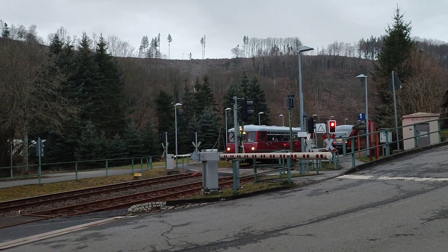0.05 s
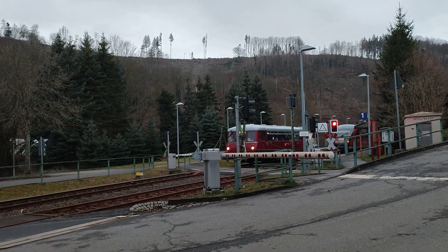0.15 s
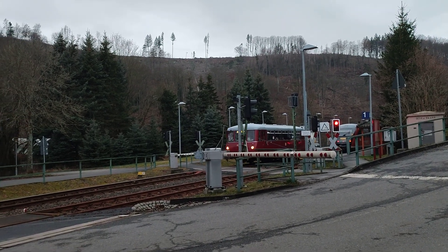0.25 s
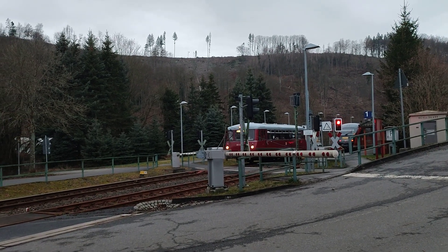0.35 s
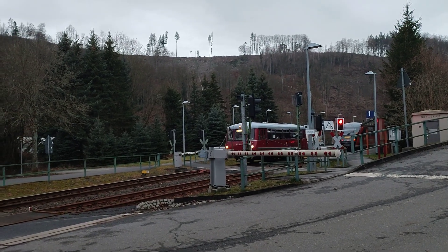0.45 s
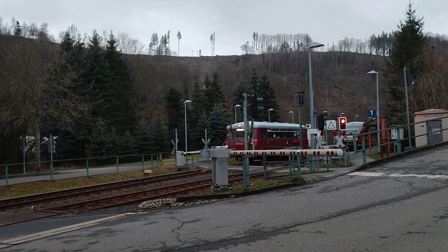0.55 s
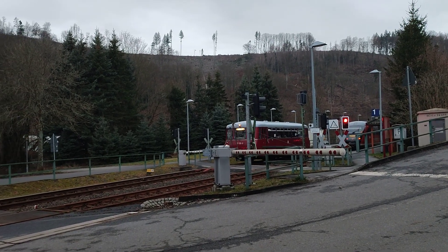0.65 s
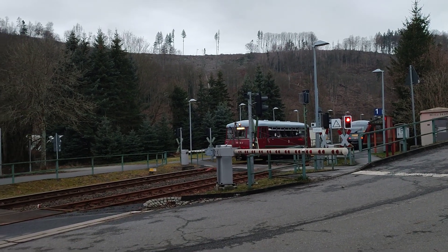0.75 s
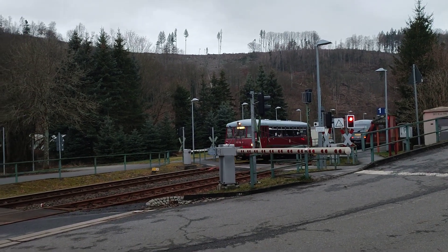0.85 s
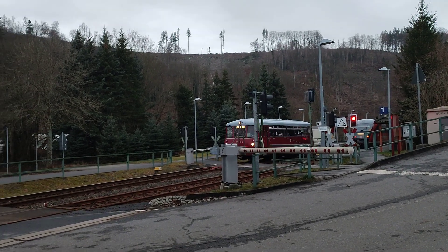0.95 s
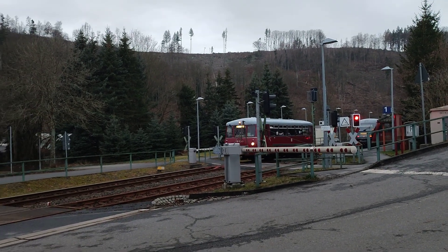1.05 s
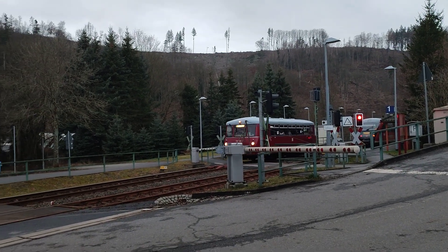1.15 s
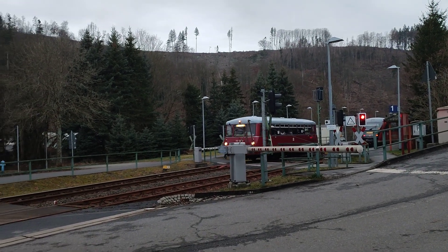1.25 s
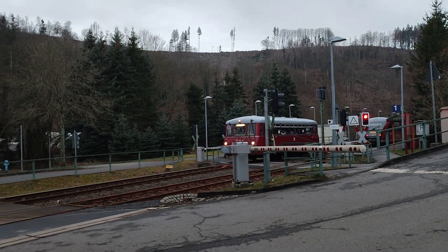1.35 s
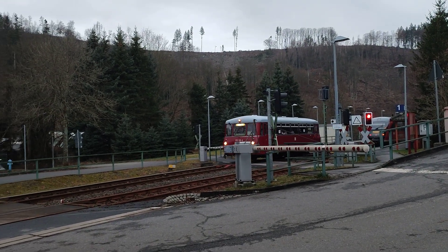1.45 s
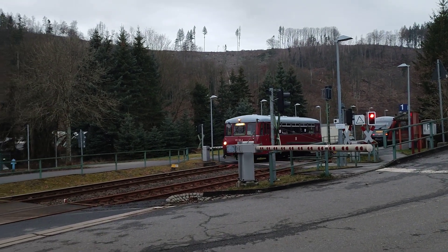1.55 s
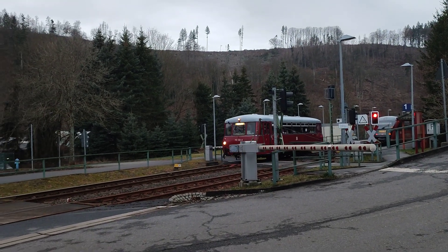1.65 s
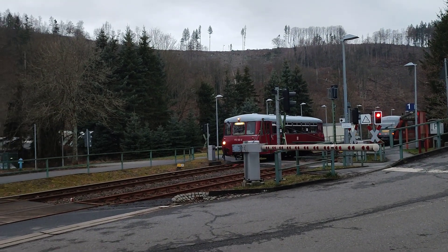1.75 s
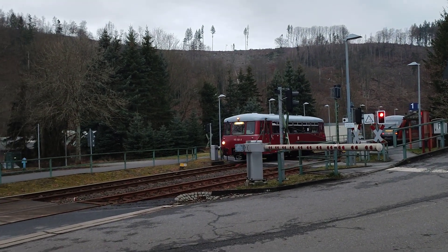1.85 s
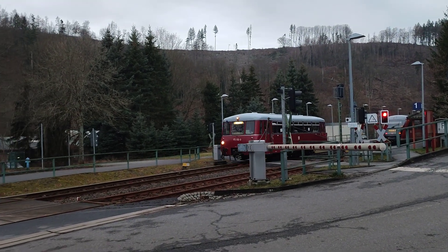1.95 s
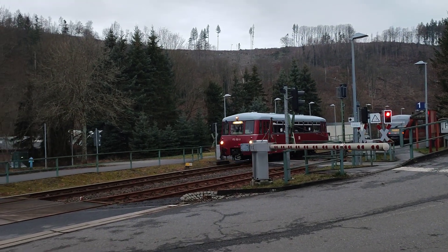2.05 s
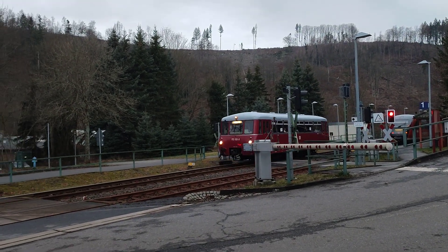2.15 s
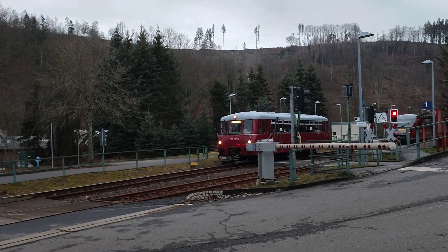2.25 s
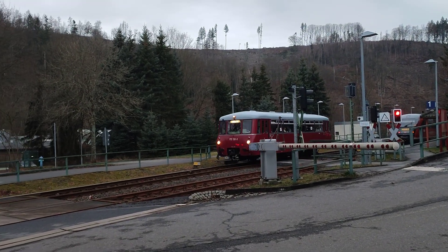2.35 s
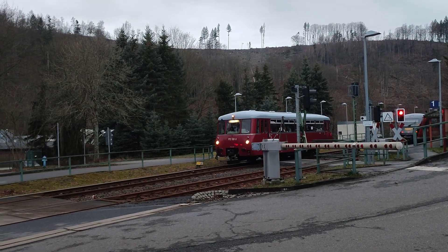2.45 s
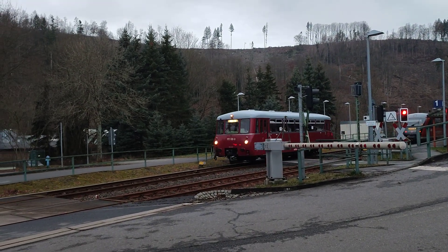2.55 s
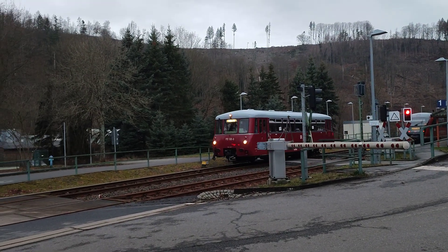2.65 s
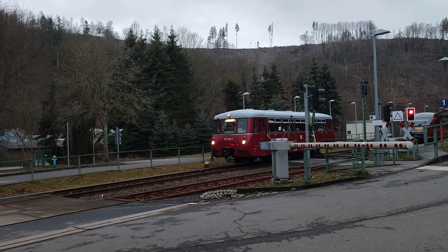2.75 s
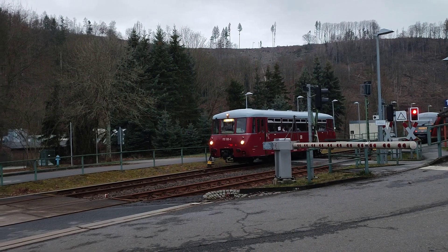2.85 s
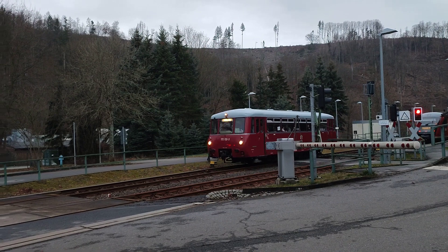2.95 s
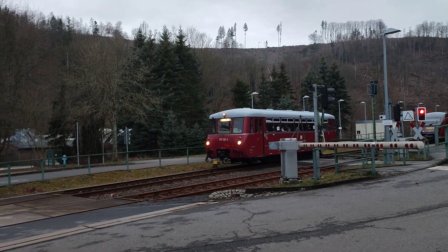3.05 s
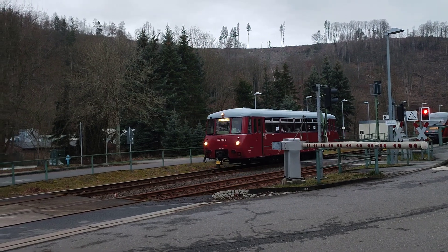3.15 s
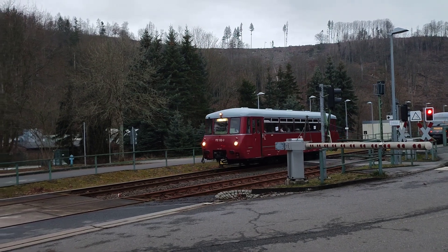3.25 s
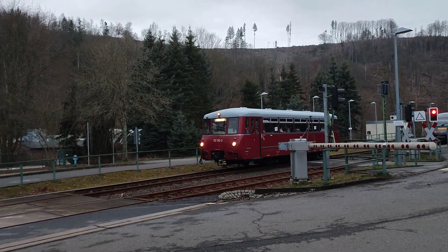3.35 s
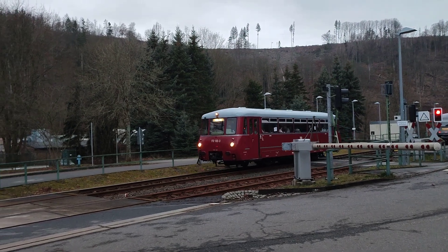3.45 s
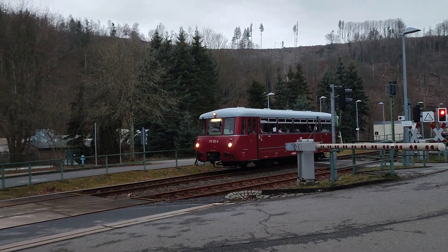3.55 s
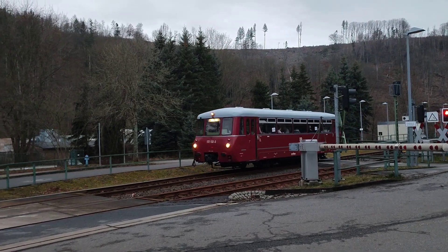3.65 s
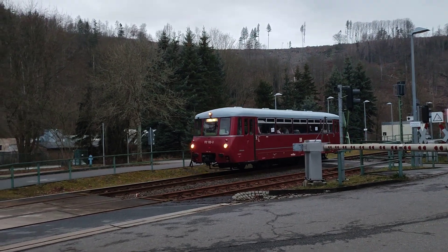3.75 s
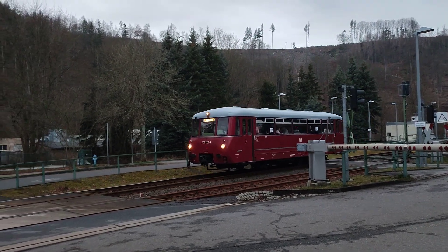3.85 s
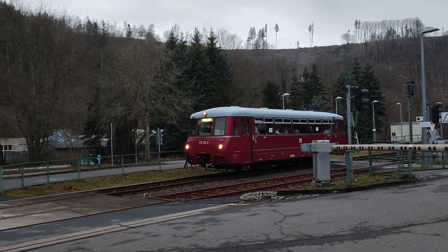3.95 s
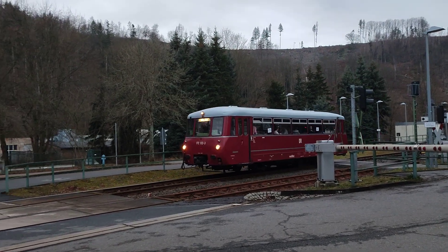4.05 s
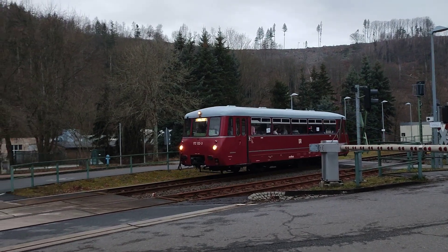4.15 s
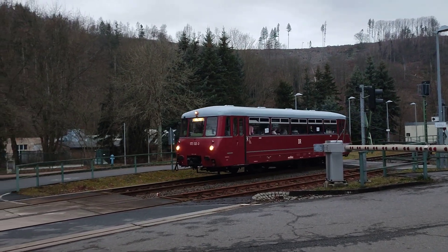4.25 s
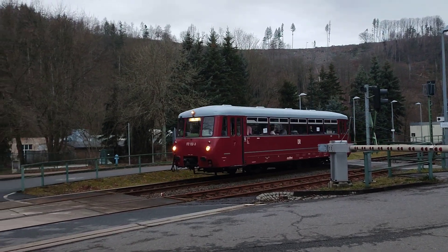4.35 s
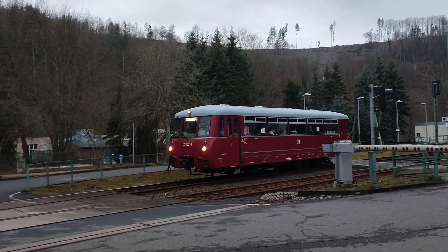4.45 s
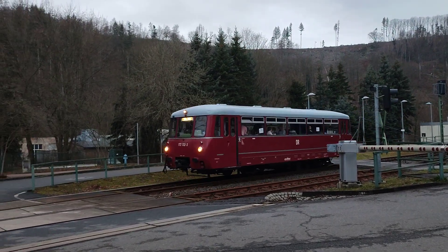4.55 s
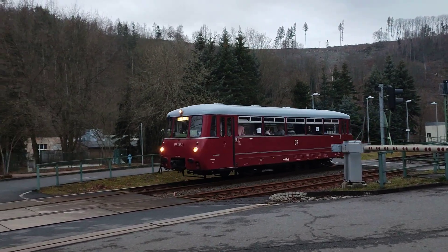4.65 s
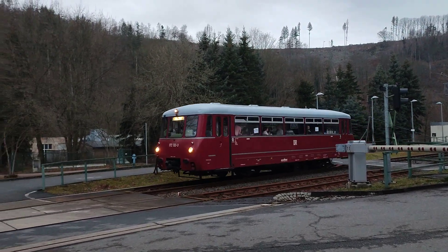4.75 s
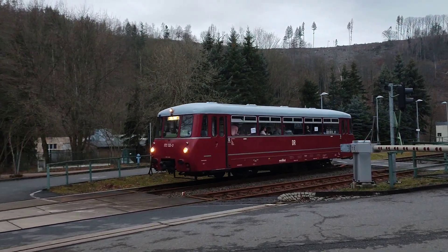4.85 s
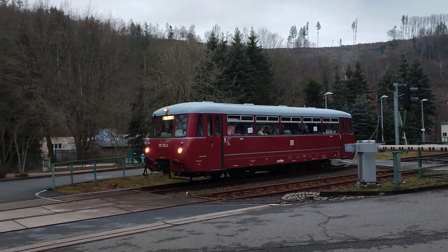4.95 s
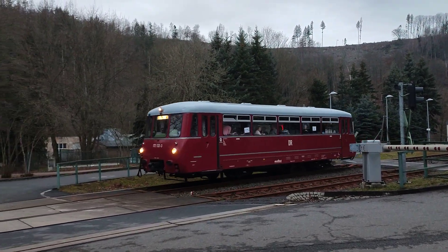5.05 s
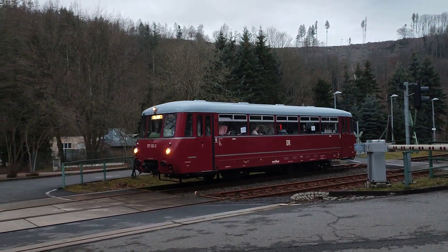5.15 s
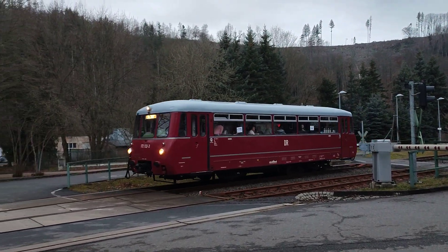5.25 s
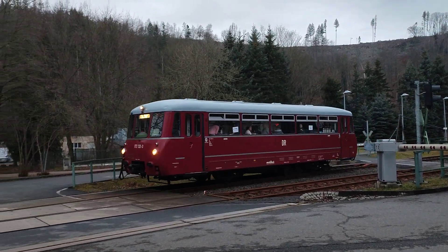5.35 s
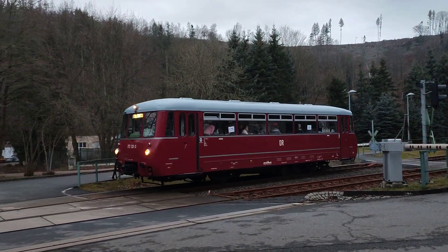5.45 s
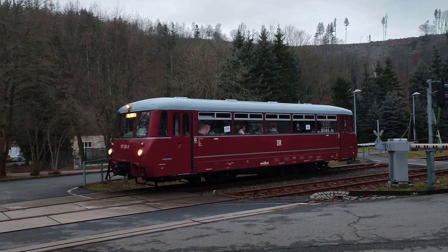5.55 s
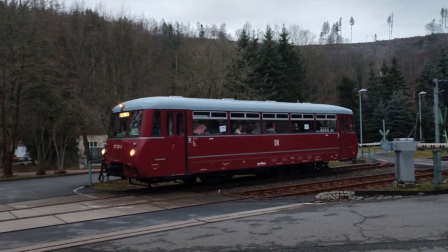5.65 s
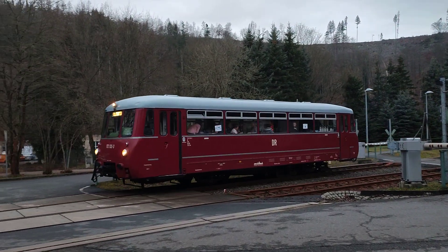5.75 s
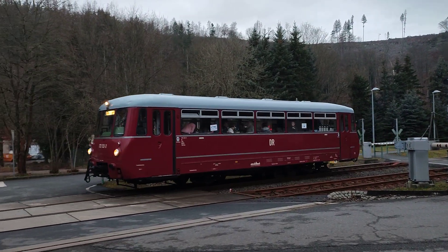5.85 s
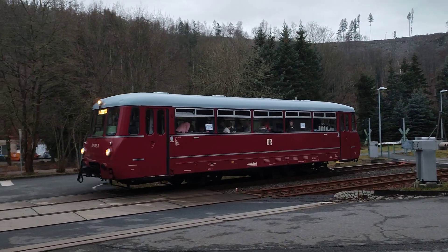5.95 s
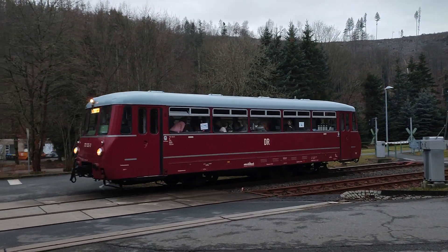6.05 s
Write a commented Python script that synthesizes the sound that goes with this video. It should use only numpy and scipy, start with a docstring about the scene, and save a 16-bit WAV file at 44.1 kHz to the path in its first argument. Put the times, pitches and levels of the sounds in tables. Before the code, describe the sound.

A diesel engine drones and rattles at a distance, its boom wavering with an echo from the hillside. It gets louder and clearer, speeds up for about a second, then its pitch drops sharply to a low idle. The railbus coasts onto the crossing close to the microphone: rough steel rolling, dull floor thuds, short clanks, and brief bright scrapes. It ends while still passing, without fading away.

```python
"""By a level crossing beyond a bend: a diesel railbus approaches, revs up, drops to idle and coasts onto it.
The exhaust is sine tones at the firing rate and its multiples; noise bursts clatter with each firing.
The air compressor chuffs short sagging notes, and filtered noise hisses in the intake as the engine speeds up.
Near the microphones the wheels roar as coloured noise and joints ring as fading sines, over a low hum."""
import sys
import numpy as np
from scipy import signal
from scipy.fft import rfft, irfft
from scipy.io import wavfile
from scipy.ndimage import uniform_filter1d

SR = 44100
rng = np.random.default_rng(int(sys.argv[2]) if len(sys.argv) > 2 else 0)


def materialize(psi):
    """Save the field psi as 16-bit PCM at rate SR to the path in sys.argv[1].

    A 1-D psi becomes a single channel; in a 2-D psi each row is a channel.
    """
    bounded = np.clip(np.atleast_2d(psi).T, -1, 1)
    quanta = np.round(bounded * 32767).astype(np.int16)
    wavfile.write(sys.argv[1], SR, quanta)


N = 268569
TIME, HZ = np.arange(N) / SR, np.fft.rfftfreq(N, 1 / SR)  # every sample in s, every bin in Hz

# engine effort: time_s, effort (-1 coasting, 0 cruising, 1 full)
EFFORT = [(3.05, 0.47), (3.95, 1), (4.27, 0.93), (4.5, 0.31), (4.66, -0.12), (4.73, -0.62)]
# start and end (s) of rolling onto the crossing
ONTO_CROSSING_S = (4.9, 5.76)


def amp(db):
    """Decibels to gain."""
    return 10 ** (np.asarray(db) / 20)


def unit(x):
    """Scales to rms 1."""
    return x / np.sqrt(np.mean(x ** 2) + 1e-20)


def curve(rows):
    """A time table at every sample."""
    return np.interp(TIME, *np.transpose(rows))


def read(points):
    """A frequency table at every bin, interpolated over log frequency."""
    f, value = np.transpose(points)
    return np.interp(np.log(HZ + 1), np.log(f + 1), value)


def ramp(span):
    """Goes from 0 to 1 between two times."""
    start, end = span
    return np.clip((TIME - start) / (end - start), 0, 1)


def swells(rows):
    """Brief smooth rises or dips, in dB."""
    return sum(db * np.exp(-((TIME - s) / half) ** 2) for s, half, db in rows)


def wander(hz):
    """Slow random wavering of rms 1, up to about hz."""
    coarse = TIME[::100]
    f = np.fft.rfftfreq(len(coarse), coarse[1])
    spectrum = rfft(rng.standard_normal(len(coarse))) / (1 + (f / hz) ** 4)
    return np.interp(TIME, coarse, unit(irfft(spectrum, len(coarse))))


def peak(hz, width):
    """A resonance curve at every bin, down to half at one width either side."""
    return 1 / (1 + ((HZ - hz) / width) ** 2)


def noise(colour):
    """Coloured noise at both microphones; scattering makes the treble differ."""
    # likeness of the microphone pair: frequency_hz, likeness (0-1)
    likeness = [(25, .997), (300, .996), (450, .96), (630, .91), (1380, .66), (3000, .62), (5500, .36),
                (15000, .3)]
    a, b = rfft(rng.standard_normal((2, N)))
    same = np.clip(read(likeness), 0, 1)
    other = same * a + np.sqrt(1 - same ** 2) * b
    return unit(irfft(np.array([a, other]) * colour, N))


def level(layer):
    """A layer's dB from the railbus's distance, the engine's effort and the place on the track."""
    # layer: level_db (cruising, at the starting distance), share of the gain from nearness,
    # effort_db (per unit of effort), hidden_db (behind the bend), crossing_db (on the crossing)
    layer_levels = { "boom": (-49, 1.21, 4, 2.5, 0), "overtones": (-45.5, 0.22, 1.5, -2.5, -7),
                    "compressor": (-38.5, 0.33, -0.5, -11, -4.5), "rumble": (-46, 1.14, 1.5, -4, -2),
                    "drone": (-55.5, 1.7341, 1, 1, -1), "clatter": (-55.5, 1.145, 5.5, -0.8, -4.5),
                    "crankcase": (-53, 0.15, 3, -5, -16), "fizz": (-58.5, 0.5, 5, -7.5, 5),
                    "rolling": (-53, 0.2565, 2.1, -8.5, 10.5), "slabs": (-62.5, 1.73, 0, 0, 3.5),
                    "flanges": (-73, 2, -2, 8, -3), }
    speed_m_per_s, closest_m, closest_s = 5.9, 9.15, 7.67  # the closest point would come after the end
    emerge_s = (0.31, 2.38)  # coming out from behind the bend
    db, near_share, effort_db, hidden_db, crossing_db = layer_levels[layer]
    metres = np.hypot(speed_m_per_s * (closest_s - TIME), closest_m)
    near_db = 20 * np.log10(metres[0] / metres)
    db = db + near_share * near_db + effort_db * curve(EFFORT)
    return db + hidden_db * (1 - ramp(emerge_s)) + crossing_db * ramp(ONTO_CROSSING_S)


def firings():
    """Count of cylinder firings so far, the running sum of the firing rate."""
    # engine speed: time_s, firing_rate_hz
    firing_rate = [(0, 53.31), (1.9, 54.53), (3.05, 56.12), (3.45, 60.22), (4.05, 63.85), (4.28, 62.45),
                   (4.62, 55.42), (4.85, 47), (5.05, 42.5), (5.3, 39.41), (6.09, 38.94)]
    return np.cumsum(curve(firing_rate)) / SR


def strokes():
    """Count of compressor strokes so far; it is belted to the engine."""
    return firings() / 6.645 + .26


def bursts(turns, decay, floor):
    """A sharp burst at every turn over a steady floor, dying within the share decay of the turn."""
    burst = abs(floor) + np.exp(-(turns % 1) / decay)
    return burst / np.sqrt(uniform_filter1d(burst ** 2, SR // 2))  # evens out the power


def hum():
    """Low lines of an idling machine, each wavering slightly in level."""
    # machine lines: pitch_hz, level_db
    machine_lines = [(41.5, -50.5), (65, -58.5), (35.7, -53.5)]
    total = 0
    for hz, db in machine_lines:
        total = total + amp(db + 0.9 * wander(3.6)) * np.sin(2 * np.pi * (hz * TIME + rng.random()))
    return np.sqrt(2) * total


def wheels(ring_db=-10.0, ring_flicker_db=3.0, scrape_flicker_db=0.7):
    """Rough steel rolls on steel; flanges scrape in the curve, and on the crossing each bite rings the discs."""
    # rolling roar: frequency_hz, relative_density_db
    roar_colour = [(250, -7), (430, -25), (590, 0.5), (720, 0.5), (900, 0), (1150, 1.5), (1450, -7),
                   (2500, -12.5), (3300, -15), (4200, -28), (12000, -41)]
    # hollow roar of the crossing's slabs as the wheels reach them: frequency_hz, relative_density_db
    slab_colour = [(60, -17), (95, 5), (130, -21), (200, 1), (245, 8.5), (340, 4), (430, 0), (530, 4),
                   (640, -5.5), (900, -14), (2000, -41)]
    # flange scrape: frequency_hz, relative_density_db
    scrape_colour = [(1500, -1), (2800, 5.5), (3800, -1), (4700, 5), (5600, -5), (6400, -7), (7500, -7),
                     (8200, -10), (9000, -8.5), (12500, -19), (15000, -36)]
    # wheels meet rough rail on the crossing: centre_s, half_length_s, rise_db
    rough_rail = [(5.35, 0.071, 2.5), (6.04, 0.025, 2)]
    # flanges bite the rail: centre_s, half_length_s, scrape_rise_db, disc_ring_rise_db
    bites = [(5.38, .03, -2, 7), (5.517, 0.023, 8.5, 12), (5.701, .025, 3, 6.5), (5.792, 0.058, 7, 6),
             (5.937, .025, 0, 8), (6.05, .03, 2, 3)]
    roar = noise(amp(read(roar_colour))) * amp(level("rolling") + swells(rough_rail) + 0.9 * wander(44))
    slabs = noise(amp(read(slab_colour))) * amp(level("slabs"))
    s, half, scrape_db, disc_db = np.transpose(bites)
    ring_gain = amp(ring_db + swells(zip(s, half, disc_db)) + ring_flicker_db * wander(16.0))
    ring = ring_gain * ramp(ONTO_CROSSING_S) * noise(peak(6060, 210.3) ** 2)
    scrape_gain = amp(swells(zip(s, half, scrape_db)) + scrape_flicker_db * wander(27))
    scrape = noise(amp(read(scrape_colour))) * scrape_gain
    return roar + slabs + (scrape + ring) * amp(level("flanges"))


def joints(scatter_db=-8.0, scatter_t60=0.25, rise_s=0.008):
    """Wheels drop into rail joints: floor thuds, underframe booms, wheel set clanks, loose parts shake on."""
    # blows at rail joints and slab edges: start_s, floor_thud_db, underframe_boom_db, clank_db
    blows = [(4.381, -42, -38, -39), (4.484, -26, -50, -50), (4.555, -27, -45, -43), (4.658, -27, -35, -35),
             (4.935, -42, -39, -40), (5.158, -40, -27, -40), (5.186, -35, -25.5, -24),
             (5.228, -41, -29, -38), (5.395, -40, -31, -37), (5.462, -44, -21.5, -28), (5.5, -29, -38, -42),
             (5.53, -42, -36, -33.5), (5.565, -25, -31, -53), (5.675, -36, -23.5, -44),
             (5.698, -25, -22.5, -29), (5.728, -40, -22, -31), (5.772, -26.5, -26.5, -40),
             (5.86, -36, -26.5, -42), (5.925, -26, -38, -51), (6.013, -40, -28.5, -33)]
    # modes of the floor: nominal_pitch_hz, relative_level_db, t60_s
    thud_modes = [(104, 0, .22), (128, -6, .14)]
    # modes of the underframe: nominal_pitch_hz, relative_level_db, t60_s
    frame_modes = [(227, 0, .24), (254, -2, .16)]
    # modes of the wheel set: nominal_pitch_hz, relative_level_db, t60_s
    clank_modes = [(156, -2, .17), (192, -7, .14), (319, -5, .16), (437, -5, .14), (535, -7, .12),
                   (617, -6, .1)]
    # loose parts shaken by a blow: frequency_hz, relative_density_db
    loose_colour = [(50, -18), (130, 4), (280, -3), (400, -4), (600, -2), (800, -24), (2000, -32),
                    (6000, -57)]
    out, shaking = np.zeros(N), np.zeros(N)
    for s, thud_db, frame_db, clank_db in blows:
        span = slice(round(s * SR), round(s * SR) + SR // 2)
        age = TIME[:len(out[span])]
        onset = 1 - np.exp(-age / rise_s)
        for blow_db, modes in [(thud_db, thud_modes), (frame_db, frame_modes), (clank_db, clank_modes)]:
            for hz, db, t60 in modes:
                fade = onset * amp(blow_db + db - 60 * age / t60)
                pitch_hz = hz * rng.uniform(0.96, 1.03)  # no two blows quite alike
                out[span] += fade * np.sin(2 * np.pi * pitch_hz * age + rng.normal(0, 0.69))
        shaking[span] += (onset * amp(clank_db - 60 * age / scatter_t60)) ** 2
    return out + amp(scatter_db) * np.sqrt(shaking) * noise(amp(read(loose_colour)))


def shudder(colour, count=44):
    """A shaking that repeats with every stroke: close lines that slide through the body's resonances."""
    coarse, turns = TIME[::20], strokes()[::20]
    k = np.arange(3, count)[:, None]  # multiples of the stroke rate
    gain = np.interp(k * np.gradient(turns, coarse), HZ, colour)
    lines = gain * np.sin(2 * np.pi * (k * turns + rng.random(k.shape)))
    return unit(signal.resample_poly(lines.sum(0), 20, 1, window=("kaiser", 10))[:N])


def body(steady_db=-3.5, loose_db=-7.5, floor_hz=101, floor_db=-3):
    """The machinery shakes the car body; the floor and side panels drone as it comes near."""
    # body rumble: frequency_hz, relative_density_db
    rumble_colour = [(15, -12), (35, -10), (70, -7), (88, -3), (104, 3.5), (125, 0.5), (150, -5.5),
                     (200, -9.5), (320, -6), (400, -29.5), (900, -61)]
    # lurches on uneven track: centre_s, half_length_s, rise_db
    lurches = [(.48, 0.045, 8), (1.135, 0.035, 3), (1.35, 0.06, 5), (2.33, 0.16, 4.5), (3.4, 0.27, 4.5),
               (4.15, 0.052, 2), (4.7, .06, 4)]
    colour = amp(read(rumble_colour))
    rumble = amp(loose_db) * noise(colour) + amp(steady_db) * shudder(colour)
    side_panels = peak(227.8, 15.5) ** 2 + 0.72 * peak(254.2, 13) ** 2
    panels = noise(side_panels + amp(floor_db) * peak(floor_hz, 3.8) ** 2)
    return amp(level("rumble") + swells(lurches)) * rumble + amp(level("drone")) * panels


def compressor(tone_db=-4, air_db=-17, slip_rad=0.3, scatter_db=0.5, sag_hz_per_s=600):
    """Each stroke blows a short note that sags in the intake pipe; the return answers softer and lower."""
    turns = strokes()
    rate = np.gradient(turns) * SR
    tone = np.zeros(N)
    # stroke and return: lead (strokes), mid-note pitch (Hz), Gaussian spread (s), relative level (dB)
    for lead, hz, spread_s, db in [(0, 278, 0.015, 0), (0.43, 262, 0.014, -8)]:
        stroke = (turns + lead).astype(int)
        age = ((turns + lead) % 1 - .5) / rate  # seconds from mid-stroke
        size, slip = rng.standard_normal((100, 2))[stroke].T
        note = np.sin(2 * np.pi * (hz - sag_hz_per_s * age / 2) * age + slip_rad * slip)
        tone += amp(db + scatter_db * size) * np.exp(-.5 * (age / spread_s) ** 2) * note
    air = noise(peak(289, 42.0) ** 2 + 1.3 * peak(335, 7.8) ** 2)
    return amp(level("compressor")) * (amp(tone_db) * unit(tone) + amp(air_db) * air)


def crankcase(floor=5.4, decay=0.35):
    """The crankcase barks at every firing, some cylinders harder than others."""
    # strength of each cylinder's firing: relative_level_db
    cylinder_db = [-0.4, -1.6, -0.39, 0.7, 1.9, -0.93]
    # bark: frequency_hz, relative_density_db
    bark_colour = [(300, -21), (440, -20), (590, 1), (720, 2), (1150, 2), (1400, -8.5), (2200, -47),
                   (4000, -48)]
    # resonances: pitch_hz, width_hz, relative_level_db
    case_rings = [(575.4, 13.4, 5), (808, 13, -2), (928, 13, -4), (1059, 14, 2.5)]
    # the engine side comes into the open out of the bend: centre_s, half_length_s, rise_db
    clear_view = [(2.45, 0.81, 3)]
    turns = firings()
    strength = amp(cylinder_db)[turns.astype(int) % len(cylinder_db)]
    rings = sum(amp(db) * peak(hz, width) ** 2 for hz, width, db in case_rings)
    bark = noise(amp(read(bark_colour)) + rings) * unit(strength * bursts(turns, decay, floor))
    return amp(level("crankcase") + swells(clear_view)) * bark


def injectors(turns, colour, ring_s=0.02, count=6, size=2048):
    """Each cylinder knocks with a short ring of its own, the same at every firing."""
    starts = np.flatnonzero(np.diff(np.floor(turns)))
    age, metal = TIME[:size], noise(colour)
    out = np.zeros((2, N + size))
    for n, start in enumerate(starts):
        first = n % count * size  # this cylinder's own stretch of noise
        out[:, start:start + size] += metal[:, first:first + size] * np.exp(-age / ring_s)
    return unit(out[:, :N])


def intake(turns, level_db=-50):
    """Air hisses in bursts at every second firing while the engine speeds up."""
    # intake hiss: frequency_hz, relative_density_db
    intake_colour = [(3000, -11), (5000, -23), (6400, 0.5), (7300, 5.5), (8300, 0), (9300, -15.5),
                     (10300, -12), (11500, -28), (12700, -11), (15000, -43)]
    open_s, shut_s = (2.8, 3.56), (3.96, 4.42)  # start and end of its rise and of its fall
    gate = ramp(open_s) * (1 - ramp(shut_s))
    return noise(amp(read(intake_colour))) * amp(level_db) * gate * bursts(turns / 2, decay=0.16, floor=1.0)


def clatter(uneven_db=1.0, rattle_db=-0.6, knock_db=-9.5, ring_db=-5.5, ring_effort_db=3):
    """Every firing knocks the block and rattles its fittings; the block's ring weakens in coasting."""
    # rattling fittings: frequency_hz, relative_density_db
    fitting_colour = [(300, -14), (440, -4), (620, -5.5), (1100, -1.5), (1450, 1), (1900, 1.5),
                      (2400, -3.5), (3200, -7.5), (4100, -18), (6000, -30.5), (9000, -44), (15000, -68)]
    # engine block resonances: pitch_hz, width_hz, relative_level_db
    block_rings = [(1655, 61, -4), (1807, 76, 2), (1900, 47, -8), (2180, 53, -6), (2338, 100, -6.5)]
    # flickering treble fizz: frequency_hz, relative_density_db
    fizz_colour = [(2000, -10), (4000, -7), (5000, 0), (6400, 1.5), (7200, 4), (8000, -5.5), (9300, -18),
                   (10300, -13.5), (11500, -18.5), (12700, -11), (14000, -22), (15000, -52)]
    turns = firings()
    strength = amp(uneven_db * rng.standard_normal(1000))[turns.astype(int)]
    fittings = amp(read(fitting_colour))
    block = sum(amp(db) * peak(hz, width) ** 2 for hz, width, db in block_rings)
    ring = amp(ring_db + ring_effort_db * np.minimum(curve(EFFORT), 0)) * noise(block)
    metal = amp(rattle_db) * noise(fittings) + ring
    # crisp head-on, blurred by a higher steady floor as the car turns its side
    blur = 0.95 + 0.7 * ramp((2.2, 3.5))
    rattle = metal * bursts(turns, decay=0.4, floor=blur)
    knock = amp(knock_db) * injectors(turns, fittings)
    fizz = noise(amp(read(fizz_colour))) * amp(level("fizz") + 0.98 * wander(19.0))
    return amp(level("clatter")) * unit(strength) * (rattle + knock) + fizz + intake(turns)


def hillside(fade_s=0.73):
    """Gain of the boom as its echo slides in and out of step; close by, the direct sound wins."""
    # echo off the hillside: first_null_s, period_s, echo_share (far off), gone_by_s
    hill_echo = (0.16, 0.88, 0.57, 3.5)
    null_s, period_s, share, gone_s = hill_echo
    echo = share * (1 - ramp((gone_s - fade_s, gone_s)))
    return abs(1 - echo * np.exp(2j * np.pi * (TIME - null_s) / period_s))


def exhaust(jitter=0.0025, flutter_db=1.5, flutter_hz=4):
    """Firing pulses boom from the exhaust at the firing rate, with wavering overtones."""
    # exhaust overtones: multiple of the firing rate, relative_level_db
    overtones = [(1.5, -18), (2, -6.5), (2.5, -8.5), (3, -11.5), (3.5, -12.5), (4, -6), (4.5, -8.5),
                 (5, -8), (5.5, -16)]
    # the boom drops out briefly as the engine settles to idle: centre_s, half_length_s, change_db
    boom_dips = [(5.19, 0.11, -26), (5.73, 0.1, -6)]
    turns = firings()
    boom = amp(level("boom") + swells(boom_dips)) * hillside() * np.sin(2 * np.pi * turns)
    turns = turns + jitter * wander(2.3)
    over = np.zeros(N)
    for multiple, db in overtones:
        flutter = amp(db + flutter_db * wander(flutter_hz))
        over += flutter * np.sin(2 * np.pi * (multiple * turns + rng.random()))
    return np.sqrt(2) * (boom + amp(level("overtones")) * over)


def scene(lag_ms=0.095):
    """All sources, a little to the right: the left microphone hears them later and mostly duller."""
    # microphone pair: frequency_hz, left_minus_right_db
    pair_tilt = [(60, -.5), (250, 0), (600, -.2), (800, -1.5), (1070, -1.0), (1430, -1.5), (1910, -5),
                 (2550, -4), (3410, 2.5), (4540, -3.0), (6060, -7.5), (8090, 2), (10800, -8.5),
                 (14400, 3.5)]
    sources = hum() + wheels() + joints() + body() + compressor() + crankcase() + clatter() + exhaust()
    left, right = rfft(sources * signal.windows.tukey(N, .001))
    side = amp(read(pair_tilt) / 2)
    delay = np.exp(-2j * np.pi * HZ * lag_ms / 1000)
    return irfft(np.array([left * side * delay, right / side]), N)


def record(dry, edge_hz=15000):
    """The recorder's band limit, a steep low-pass."""
    low_pass = signal.firwin(511, edge_hz, window=("kaiser", 9), fs=SR)
    return signal.oaconvolve(dry, low_pass[None], "same")


dry = scene()
out = record(dry)
materialize(out)
```